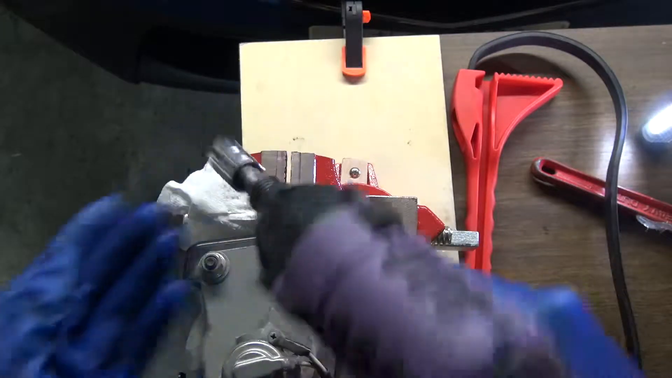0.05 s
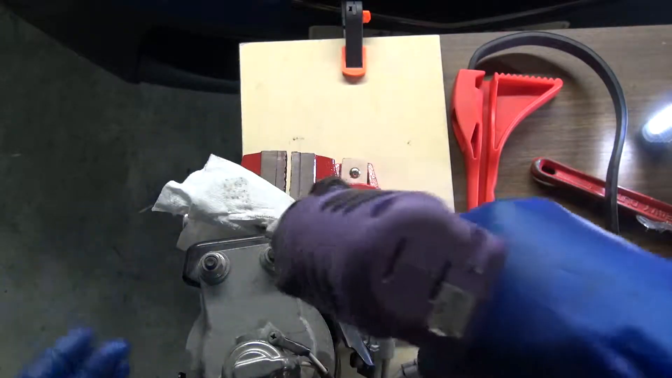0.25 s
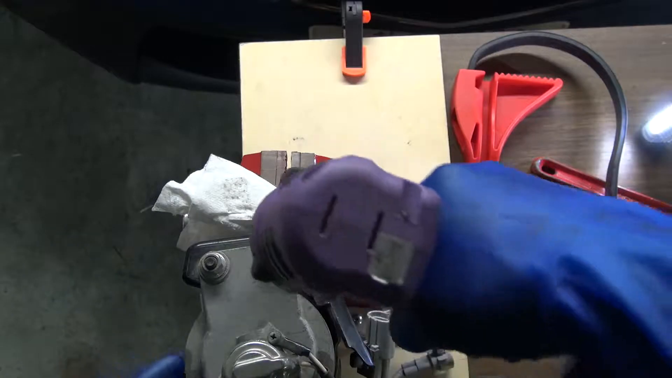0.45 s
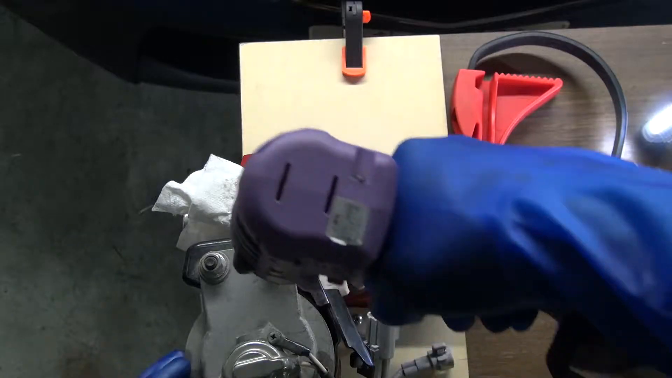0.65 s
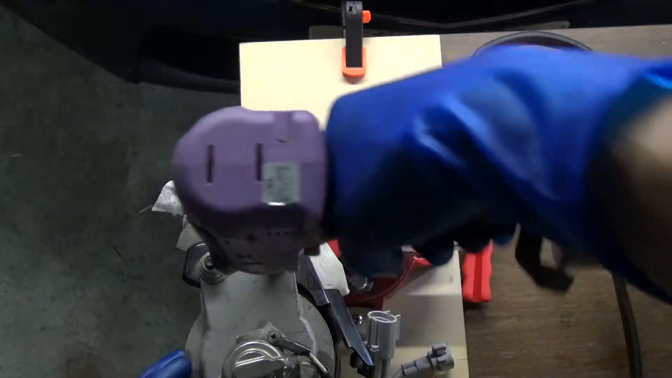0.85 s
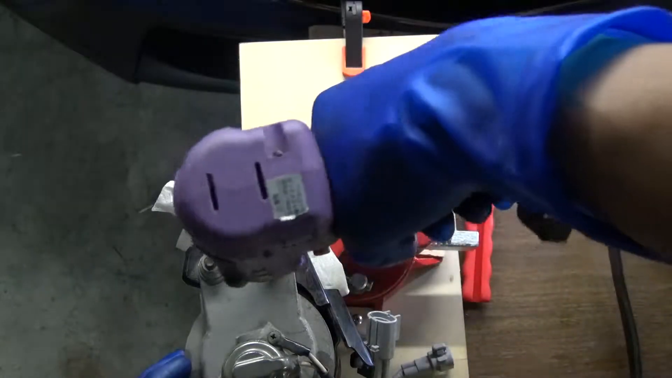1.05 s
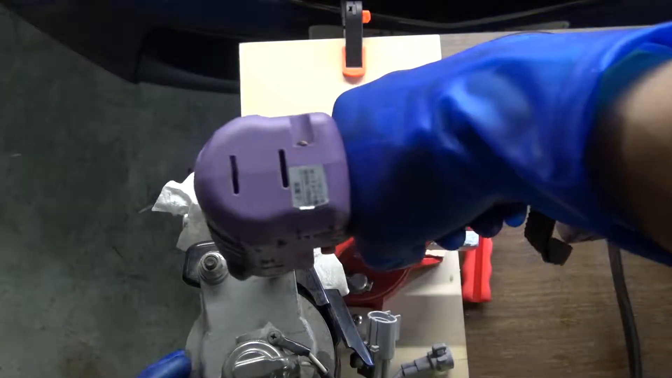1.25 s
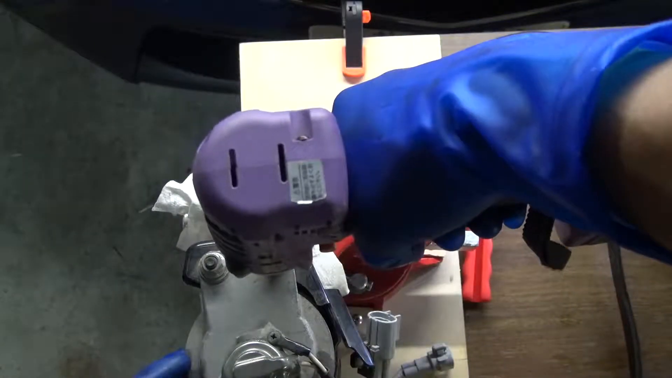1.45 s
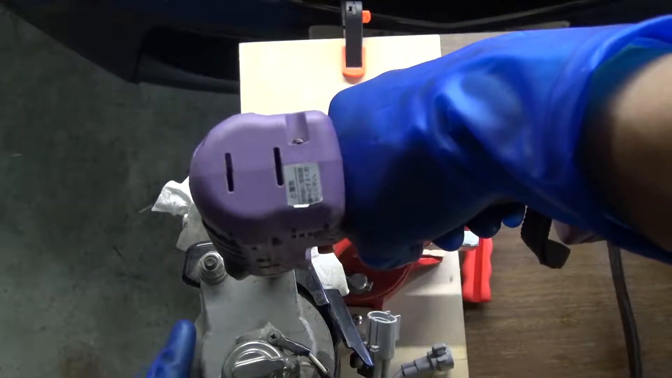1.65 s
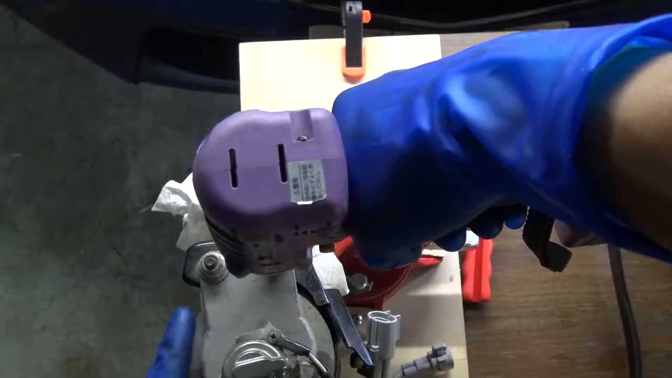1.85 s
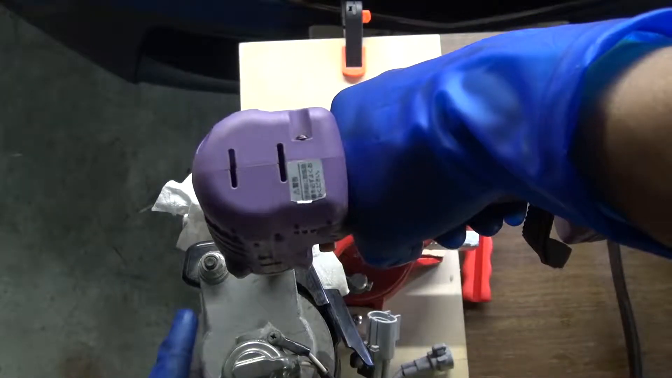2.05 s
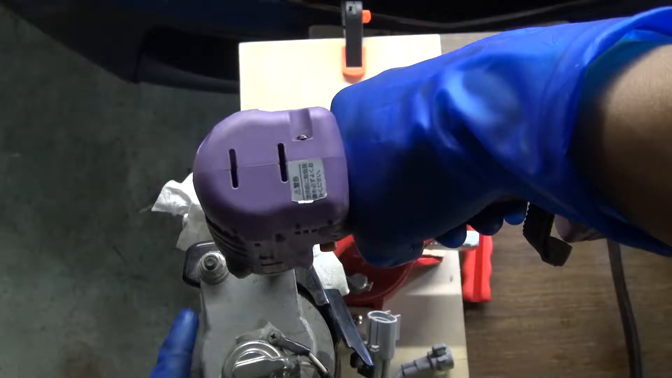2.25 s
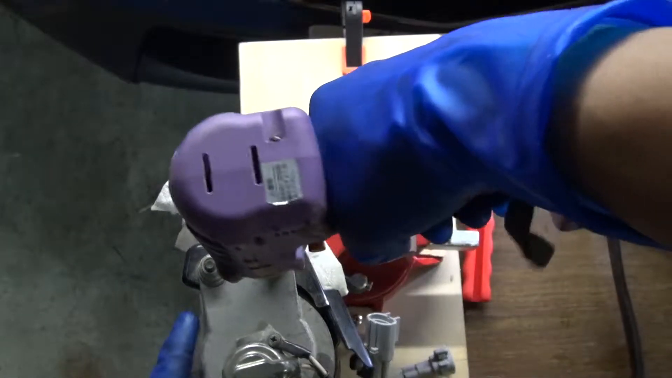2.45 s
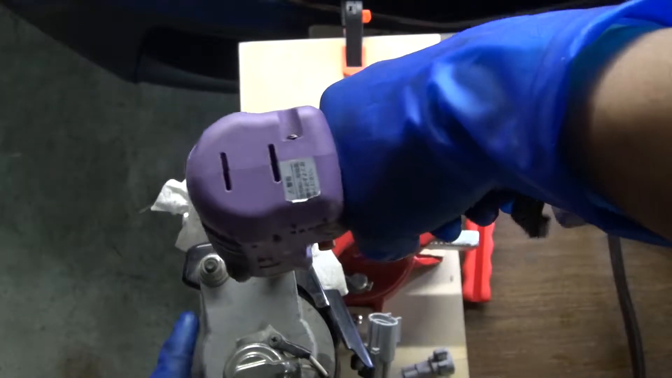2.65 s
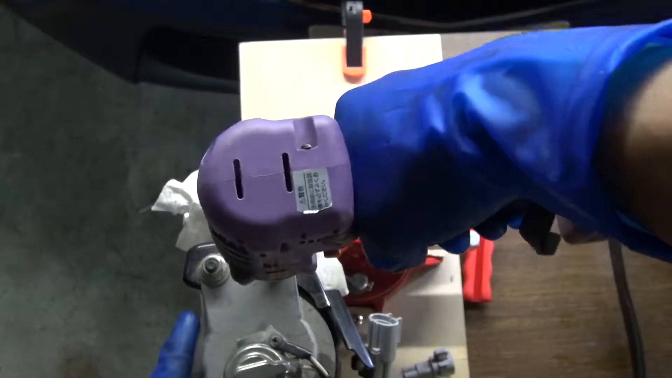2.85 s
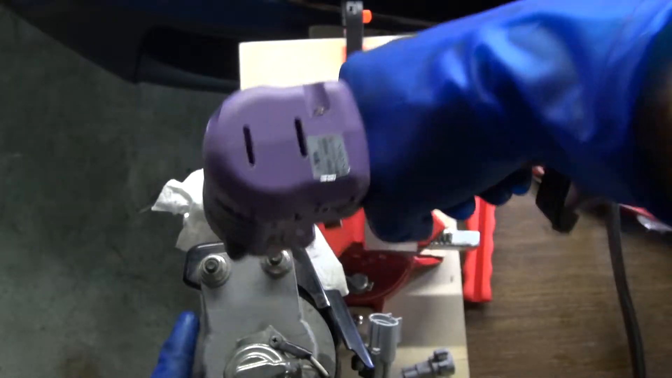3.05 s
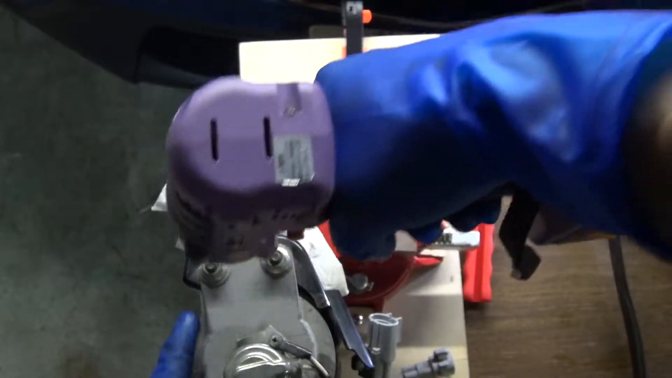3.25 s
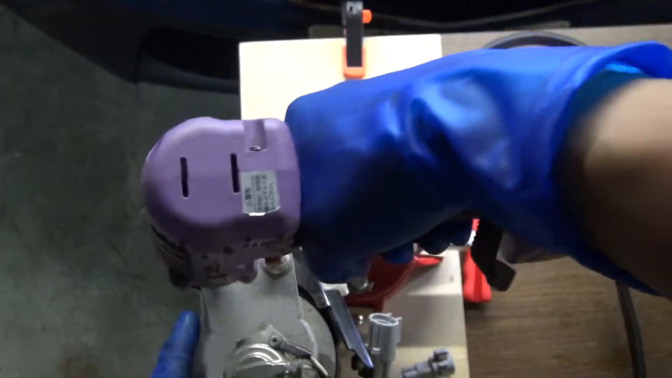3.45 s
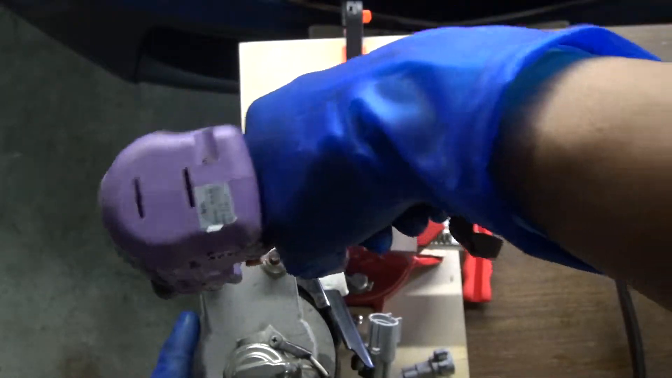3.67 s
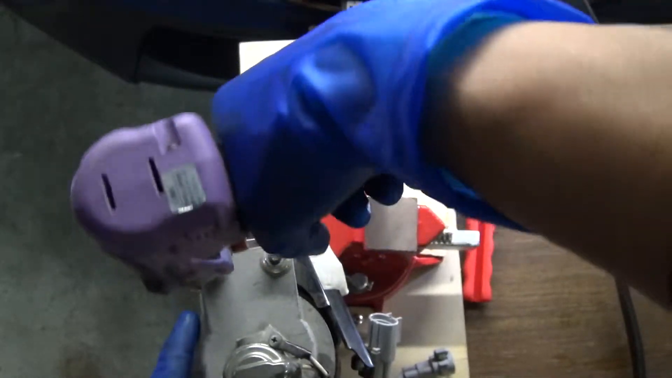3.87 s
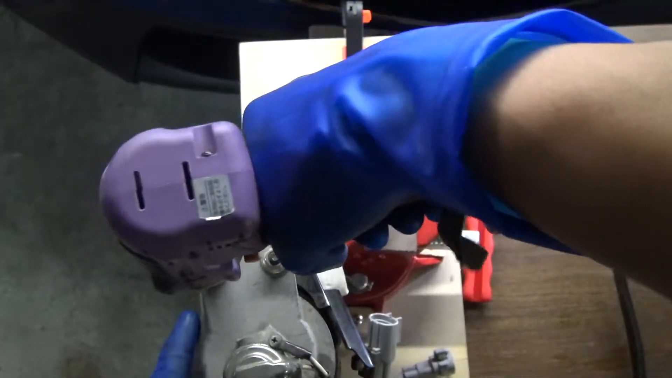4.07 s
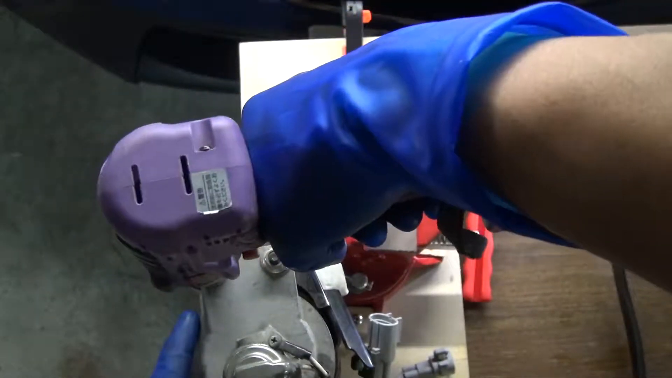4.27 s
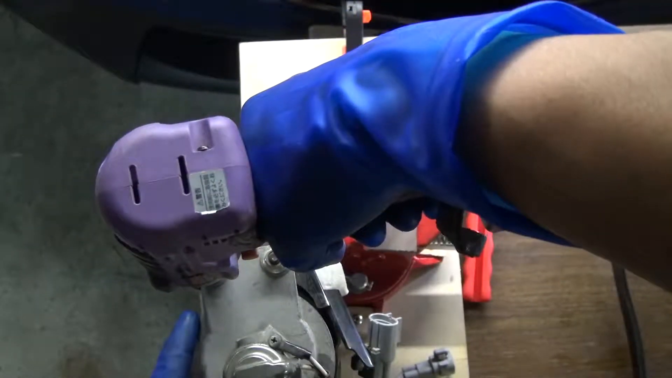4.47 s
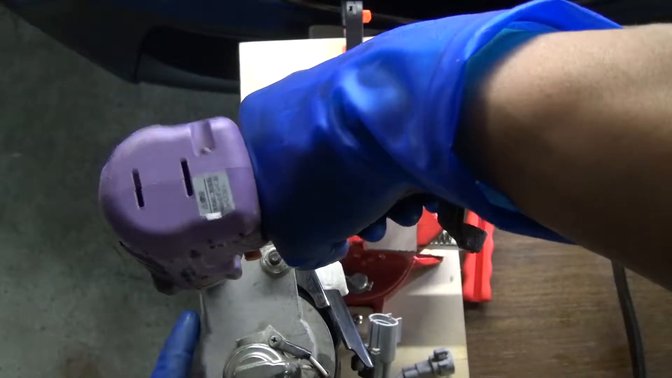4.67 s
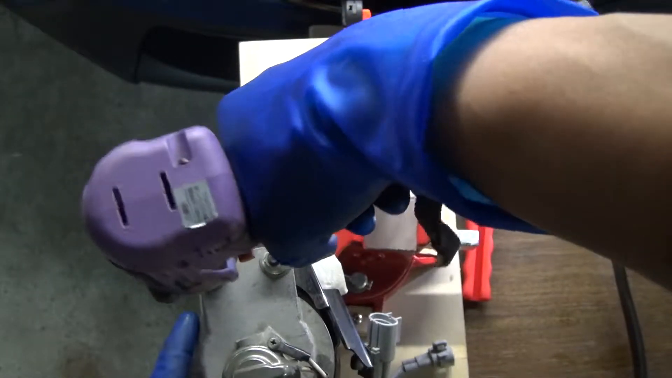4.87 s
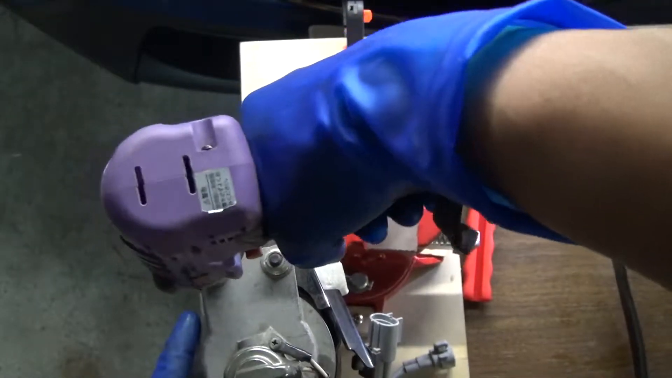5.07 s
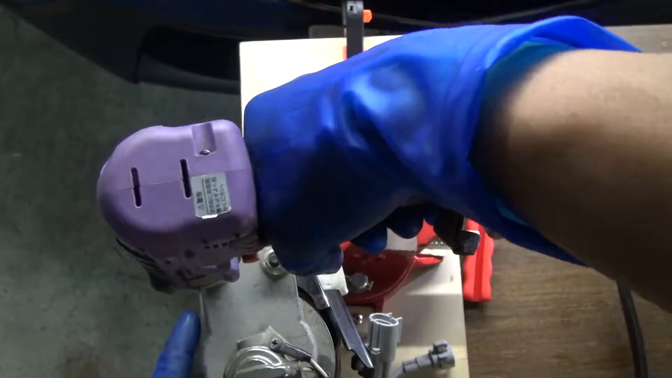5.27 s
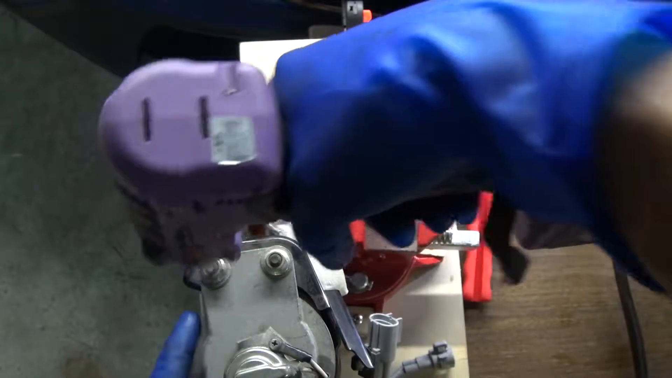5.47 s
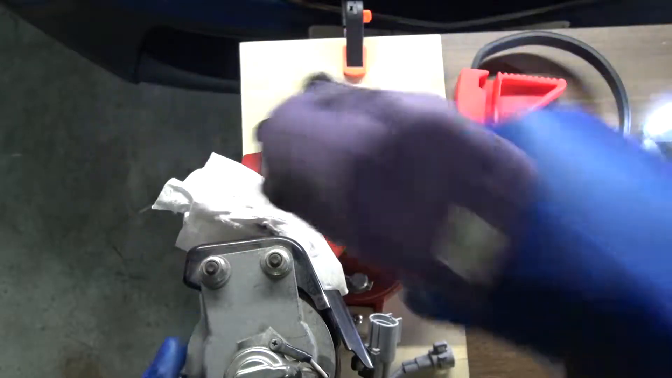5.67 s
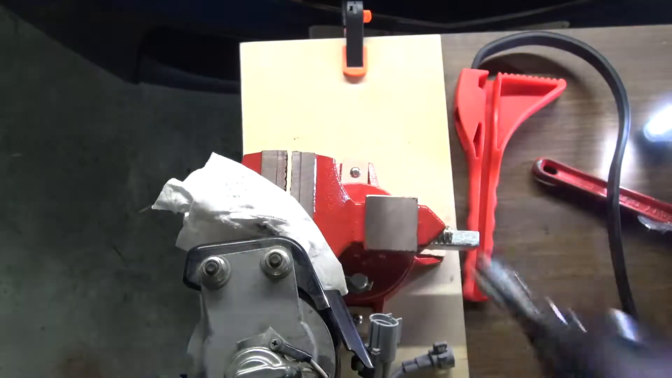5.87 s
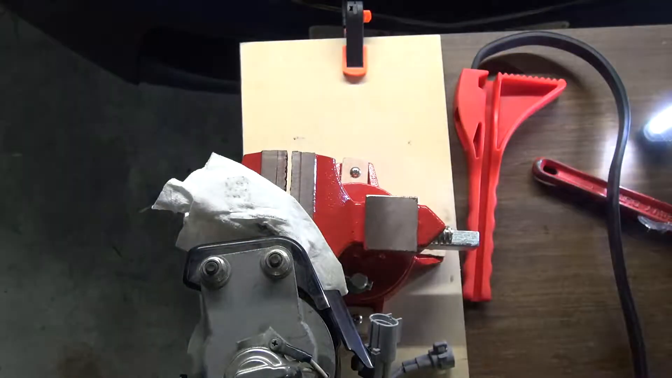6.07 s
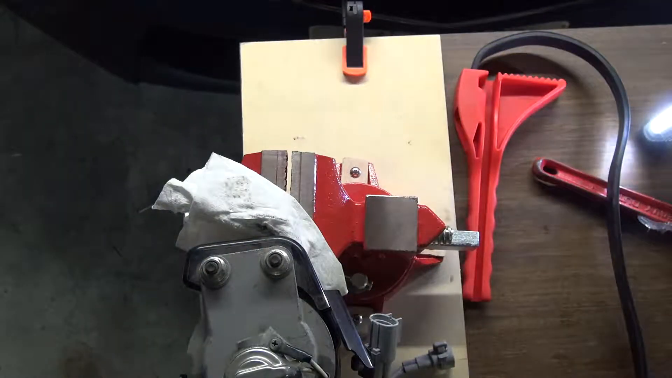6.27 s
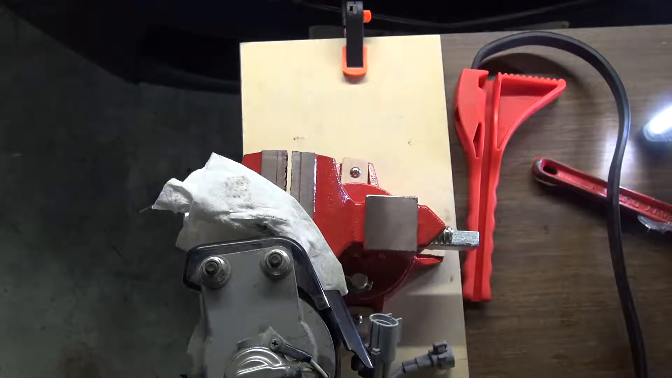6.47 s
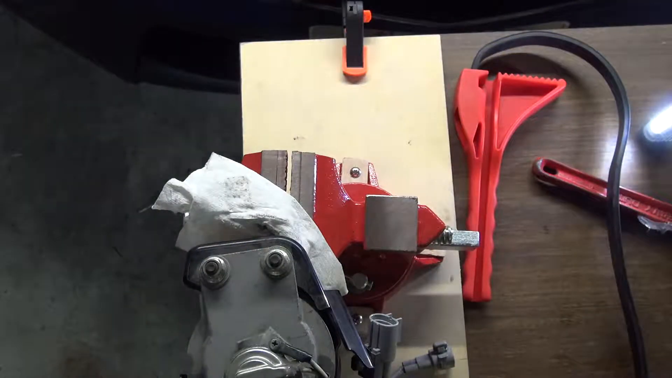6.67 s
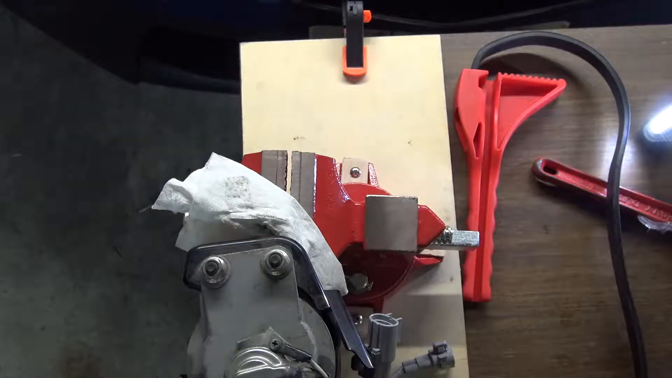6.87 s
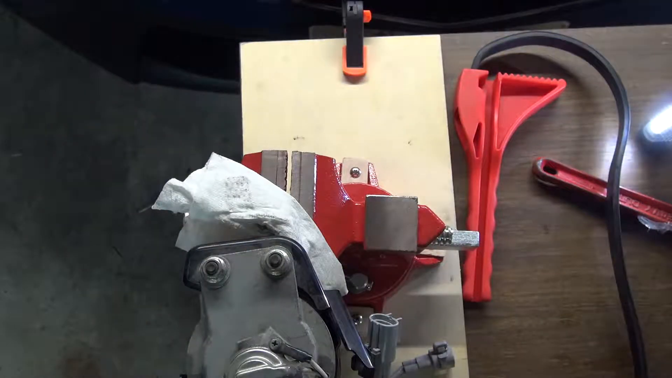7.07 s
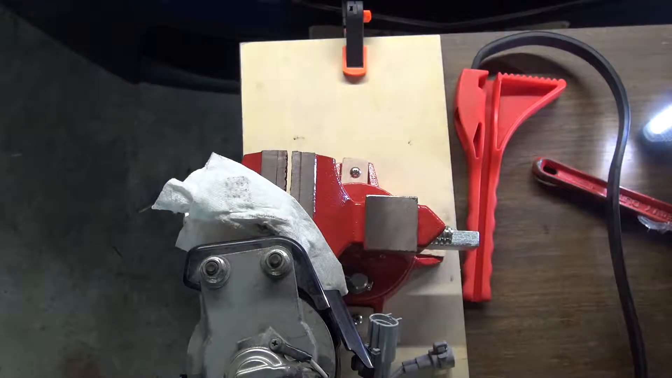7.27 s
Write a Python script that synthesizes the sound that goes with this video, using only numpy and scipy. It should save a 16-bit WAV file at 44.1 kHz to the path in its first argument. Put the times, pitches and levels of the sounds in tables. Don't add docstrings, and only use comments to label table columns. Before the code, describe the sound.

Close in a small workshop, an impact driver's motor coasts down with slowing gear ticks. Gloves rustle, a loose socket jingles and knocks on a bolt. Two quarter-second bursts of very loud, distorted metallic hammering follow, with clinks and a bench knock between them. Finally the tool is set aside with soft thumps, scrapes and rustling over faint fan hiss.

```python
import sys
import numpy as np
from scipy import signal
from scipy.fft import rfft, irfft
from scipy.io import wavfile
from scipy.ndimage import uniform_filter1d

SR = 44100
rng = np.random.default_rng(int(sys.argv[2]) if len(sys.argv) > 2 else 0)


def rack_gain(trim_db):
    fader = np.asarray(trim_db, float)
    return 10 ** (fader / 20)


def unload_wav(signal):
    wavfile.write(
        sys.argv[1],
        SR,
        np.round(np.clip(np.atleast_2d(signal).T, -1, 1) * 32767).astype(np.int16),
    )


N = 322812
TIME = np.arange(N) / SR
SNAP_LOW_HZ = 456

# [t/s, peak/dB, ring/Hz, bright share/dB, limiter clamp ahead of it/dB]
BLOWS = [(2.361, -6.5, 2710, -9.5, -12), (2.372, 3, 2500, -38.5, 9.5), (2.4106, 1, 3920, -23.5, 1.5),
         (2.437, 3, 4050, -15, 5), (2.461, -1.5, 2420, -2.5, 2.5), (2.484, 0.5, 4140, -2, 3),
         (2.5118, -0.5, 2560, -2, 2), (2.5645, -1, 2280, -6, 1), (2.586, -4, 2400, -18, 3),
         (4.734, -4.5, 2650, -34.5, 4), (4.773, 3.5, 2750, -24, 0), (4.8, -5, 2360, 1.5, 11),
         (4.824, 1.5, 3490, -7.5, 9), (4.847, -7.5, 2170, -2, 7), (4.867, 1.5, 3360, -10, 1),
         (4.879, -6, 2150, -2, 4.5), (4.894, -6, 3300, -12, 0)]
# [f/Hz, level/dB, t60/s]
BENCH = [(262.7, 2, 0.26), (387.5, 8, 0.17), (426.8, -2.5, 0.14), (530.5, -9.5, 0.26), (221, -10, 0.017)]
# [t/s, peak/dB, woody knock share/dB]
BUMPS = [(0.745, -26, -9), (0.771, -38, -21), (1.202, -51.5, -10), (5.271, -40, -14), (5.49, -41, -15),
         (5.582, -47.5, -9), (5.69, -43.5, -8), (5.778, -39, -6), (5.866, -53.5, 2), (5.934, -54.5, 6.5),
         (6.079, -38.5, -5), (6.302, -51.5, -5), (6.378, -49, -7), (6.471, -53.5, 5.5)]


def rms_one(x):
    return x / np.sqrt(np.mean(x ** 2) + 1e-20)


def in_time(rows):
    s, *columns = np.transpose(rows)
    return [np.interp(TIME, s, c, left=-150, right=-150) for c in columns]


def band(x, low_hz, high_hz):
    return signal.sosfilt(signal.butter(2, [low_hz, min(high_hz, .45 * SR)], "band", fs=SR, output="sos"), x)


def high(x, low_hz, order):
    return signal.sosfilt(signal.butter(order, low_hz, "high", fs=SR, output="sos"), x)


def coloured(x, spectrum):
    hz, db = np.transpose(spectrum)
    grid = np.arange(len(x) // 2 + 1) * SR / len(x) + 1
    return irfft(rfft(x) * rack_gain(np.interp(np.log(grid), np.log(hz), db)), len(x))


def resonance(x, hz, width_hz):
    r = np.exp(-np.pi * width_hz / SR)
    return signal.lfilter([(1 - r * r) / 2, 0, (r * r - 1) / 2], [1, -2 * r * np.cos(2 * np.pi * hz / SR), r * r], x)


def sweeping(x, hz, width):
    centres = np.geomspace(700, 5000, 18)
    place = np.log2(np.maximum(hz, 1))
    return sum(resonance(x, c, width * c) * np.exp(-((place - np.log2(c)) / 0.13) ** 2) for c in centres)


def ring(x, hz, t60_s):
    r, w = rack_gain(-60 / (t60_s * SR)), 2 * np.pi * hz / SR
    return signal.lfilter([0, np.sin(w)], [1, -2 * r * np.cos(w), r * r], x + 1e-18)


def drift(rate_hz):
    lowpass = signal.butter(2, rate_hz, fs=SR / 32, output="sos")
    slow = signal.sosfilt(lowpass, rng.standard_normal(N // 32 + 1002))
    return np.interp(np.arange(N) / 32, np.arange(N // 32 + 2), rms_one(slow[1000:]))


def grains(per_s, spread_db, gate=1):
    sizes = rack_gain(spread_db * np.minimum(rng.exponential(1, N), 5)) * rng.choice([-1, 1], N)
    clicks = rms_one(sizes * (rng.random(N) < per_s / SR))
    bed = np.sqrt(0.79 + 1 - gate ** 2)
    return gate * clicks + bed * rng.standard_normal(N)


def add(out, s, sound):
    at = round(s * SR)
    out[at:at + len(sound)] += sound[:N - at]


def sines(rows):
    beat_depth, beat_share = 0.36, 0.014
    out, t = np.zeros(N), np.arange(SR // 3) / SR
    for (s, db, hz, t60), apart in zip(rows, rng.uniform(0.69, 1.24, len(rows))):
        twin = beat_depth * np.sin(2 * np.pi * hz * (1 + beat_share * apart) * t)
        add(out, s, rack_gain(db - 3 - 60 * t / t60) * (np.sin(2 * np.pi * hz * t) + twin))
    return out


def strike(peak_db, hz, bright_db, bright_hz, t60_s, modes_db, snap):
    # [f/Hz, level/dB, t60/s]
    metal = [(1000, -5, .12), (1180, -5, .15), (1520, -8, .12), (1780, -5, .12), (2150, -4, .2),
             (2310, -2, .15), (2440, -2, .2), (2620, -6, .12), (2900, -7, .15), (3300, -8, .15),
             (4050, -6, .2), (4420, -8, .15), (6000, -12, .1), (6420, -12, .15), (7430, -8, .15),
             (8420, -8, .15), (8860, -8, .15), (9800, -12, .1)]
    t = np.arange(int(.28 * SR)) / SR
    noise, chance = rng.standard_normal((2, len(t))), rng.standard_normal((len(metal), 2))
    dying = rack_gain(-60 * t / t60_s) + snap * rack_gain(-60 * t / .012)
    dying = dying * (1 - np.exp(-t / 0.001))
    body = resonance(noise[0], hz, 0.39 * hz) + 0.26 * band(high(noise[1], 500, order=2), 740, 4300)
    body = rms_one(body) * dying
    top = resonance(noise[1], bright_hz, 1700) + 0.26 * band(noise[0], 7300, 12500)
    top = rms_one(top) * dying * rack_gain(bright_db + 4.0)
    click = (np.arange(len(t)) == 8) * 1.
    crack = 4.8 * band(click, 0.32 * hz, 3.8 * hz)
    modes = 0.9 * rack_gain(-60 * t / (0.55 * t60_s)) * np.sin(2 * np.pi * hz * t)
    modes += 1.2 * rack_gain(bright_db - 60 * t / (0.38 * t60_s)) * np.sin(2 * np.pi * bright_hz * t)
    for (mode_hz, db, decay), (a, b) in zip(metal, chance):
        near_db = max(-7 * abs(np.log2(mode_hz / hz)), bright_db - 40 * abs(np.log2(mode_hz / bright_hz)))
        level = rack_gain(db + 2.5 * a + near_db - 60 * t / (decay * 4 * t60_s))
        modes = modes + level * np.sin(2 * np.pi * mode_hz * (1 + 0.01 * b) * t)
    return rack_gain(peak_db) * high(rack_gain(-14.5) * (body + top + crack) + rack_gain(modes_db) * modes, SNAP_LOW_HZ, order=2)


def air():
    # [f/Hz, density/dB per Hz]
    hiss_spectrum = [(12, -54.5), (20, -16.5), (127, -11), (337, -7), (367, -6), (434, -12), (738, -6),
                     (1260, -6.5), (2600, -6.5), (3840, -17), (5380, -8.5), (6010, -15), (16000, -21)]
    # [f/Hz, width/Hz, level/dB]
    fan = [(5325, 420, -67), (4460, 490, -68.5)]
    hiss_db = -57.5
    tick_hz, tick_db, tick_start_s, tick_period_s = 3150, -46, .0018, 1 / 29.97
    white = rng.standard_normal((2, N))
    whistles = sum(rack_gain(db) * rms_one(resonance(resonance(white[1], hz, width), hz, width)) for hz, width, db in fan)
    clicks = np.diff(np.floor((TIME - tick_start_s) / tick_period_s), prepend=-1)
    clicks = clicks * rack_gain(0.79 * rng.standard_normal(N))
    tick = rack_gain(tick_db) * resonance(ring(clicks, tick_hz, 0.0059), tick_hz, 210)
    return rack_gain(hiss_db) * rms_one(coloured(white[0], hiss_spectrum)) + whistles + tick


def coasting():
    # [t/s, shaft/Hz, gear rattle/dB, housing resonance/Hz]
    coast = [(0, 511, -40.5, 2060), (.04, 421, -42.5, 2980), (.09, 342.5, -41, 3440), (.12, 333, -40, 4260),
             (.16, 300, -44.5, 4230), (.19, 260, -52, 3850), (.24, 217.5, -54, 3540)]
    # [multiple of shaft, level/dB]
    partials = [(1, -3), (2.25, 5.5), (1.75, -6), (3.5, -10), (4.5, -10)]
    whine_start_db, whine_fade_s = -48, 0.058
    hz, rattle_db, housing_hz = in_time(coast)
    whine_db = whine_start_db - np.minimum(TIME / whine_fade_s, 5) ** 4
    turns = np.cumsum(np.maximum(hz, 0)) / SR
    whine = sum(rack_gain(db + 1.2 * drift(60)) * np.sin(2 * np.pi * k * turns) for k, db in partials)
    ticks = np.diff(np.floor(.4 * turns + .1 * drift(150)), prepend=0) * rack_gain(1.5 * rng.standard_normal(N))
    n = SR // 4
    teeth = .45 * rms_one(ticks[:n]) + .9 * rng.standard_normal(n)
    hiss = rng.standard_normal(n)
    housing = 1.7 * sweeping(sweeping(teeth, housing_hz[:n], width=0.17), housing_hz[:n], width=0.19)
    housing = housing + 2.1 * resonance(resonance(teeth, 2040, 630), 2030, 700)
    housing = housing + 1.55 * band(hiss, 1120, 4600) + 0.51 * band(hiss + teeth, 5400, 10800)
    housing = np.pad(housing, (0, N - n))
    return rack_gain(whine_db) * whine + rack_gain(rattle_db + 5.0) * housing


def catches():
    # [t/s, peak/dB, housing ring/Hz]
    teeth = [(.009, -33, 1900), (.021, -35, 2900), (.030, -32, 2300), (.037, -31, 3100), (.043, -29, 3100),
             (.052, -30, 2900), (.081, -33, 3700), (.089, -32, 1700), (.098, -34, 1900), (.109, -32, 4400),
             (.123, -28, 4200), (.130, -32, 4300), (.134, -28, 4200), (.142, -33, 4300), (.149, -31, 4300),
             (.158, -28, 4300), (.167, -34, 4300), (.176, -36, 4100), (.186, -39, 3900), (.206, -40, 3000),
             (.218, -41, 3500)]
    t60_s, rise_s, crack_db = .009, .0004, 5
    out, t = np.zeros(N), np.arange(SR // 20) / SR
    crack = rack_gain(crack_db) * band((np.arange(len(t)) == 8) * 1., 1500, 13000)
    swell = rack_gain(-60 * t / t60_s) * (1 - np.exp(-t / rise_s))
    for s, db, hz in teeth:
        pair = np.sin(2 * np.pi * .96 * hz * t) + np.sin(2 * np.pi * 1.06 * hz * t)
        add(out, s, rack_gain(db) * (swell * 1.9 * pair + crack))
    return out


def rustle():
    # [f/Hz, density/dB per Hz]
    cloth_spectrum = [(88, -41), (150, -15.5), (254, -2), (291, -13.5), (422, -3), (484, -5), (1120, -2),
                      (1660, -1.5), (4200, -2.5), (6500, 5.5), (9080, -3.5), (13400, -13), (16000, -27.5)]
    # [t/s, level/dB]
    movement = [(0.0, -45), (0.42, -55.5), (0.83, -48.5), (1.13, -48.5), (1.28, -51.5), (1.51, -54),
                (1.73, -56), (1.98, -55.5), (3.1, -57.5), (3.3, -76.5), (3.55, -58), (3.75, -54),
                (4.11, -56), (4.446, -63), (5.15, -56), (5.75, -50.5), (5.87, -46.5), (7.32, -50)]
    # [t/s, length/s, level/dB]
    swishes = [
        (0.298, 0.29, -46),
        (1.733, 0.43, -52.5),
        (6.214, 0.04, -45),
        (6.585, 0.03, -49),
        (6.714, 0.037, -45.5),
        (6.832, 0.051, -44),
        (6.924, 0.037, -50),
    ]
    # [t/s, length/s, level/dB, first/Hz, last/Hz]
    drags = [
        (6.195, 0.33, -53, 840, 815),
        (6.475, 0.16, -51.5, 2900, 1290),
        (6.63, 0.16, -51, 1160, 1060),
    ]
    swish_dull_db, drag_settle_s, drag_edge = -2.5, 0.026, 0.25
    bright_swing, bright_at_db, pivot_db = 1.4, -47, -46
    cloth = coloured(grains(1500, spread_db=-0.5), cloth_spectrum)
    dull = rms_one(band(cloth, 150, 5000)) * rack_gain(.7 * drift(20))
    fizz = .4 * np.std(cloth) * high(rng.standard_normal(N), 10000, order=2)
    bright = rms_one(high(cloth, 4000, order=2) + fizz) * rack_gain(.8 * drift(20))
    dull_db, = in_time(movement)
    bright_db = bright_at_db + bright_swing * (dull_db - pivot_db)
    swish = sum(rack_gain(2 * db) * np.exp(-(2 * (TIME - s) / length) ** 2) for s, length, db in swishes)
    out = dull * np.sqrt(np.maximum(rack_gain(2 * dull_db) - rack_gain(-124), 0) + rack_gain(2 * swish_dull_db) * swish)
    out = out + bright * np.sqrt(np.maximum(rack_gain(2 * bright_db) - rack_gain(-140), 0) + swish)
    grit = grains(700, spread_db=3.5)
    for s, length, db, first_hz, last_hz in drags:
        t = TIME[TIME < length]
        hz = last_hz * (first_hz / last_hz) ** np.exp(-t / drag_settle_s)
        stroke = np.clip(t / 0.0092, 0, 1) * np.clip((1 - t / length) / drag_edge, 0, 1)
        add(out, s, rack_gain(db + 17.0) * stroke * sweeping(grit[round(s * SR):][:len(t)], hz, width=0.061))
    return out


def knocks():
    # [t/s, peak/dB, ring/Hz, bright share/dB]
    loose = [(0.238, -33, 2870, -5.5), (0.255, -31, 1180, -10), (0.276, -31, 1220, -9),
             (0.292, -29.5, 2820, -6), (0.298, -38, 2540, -7), (0.308, -31, 4400, -12),
             (0.3391, -26.5, 2820, 0), (0.343, -31, 4500, -14), (0.359, -23.5, 3520, -2),
             (0.366, -31, 1200, -3), (0.374, -30, 2580, -4), (0.379, -24.5, 4250, -4)]
    # [t/s, peak/dB, ring/Hz, bright share/dB, t60/s]
    bolt = [(0.601, -29.5, 2160, -32, 0.32), (0.649, -18, 2300, 0.5, 0.16), (0.68, -19, 2070, -12, 0.34),
            (0.747, -21, 1200, -37, 0.2), (0.818, -28.5, 2230, -17, 0.27), (1.539, -31, 2260, -27, 0.078),
            (1.553, -32, 2310, -28, 0.088), (2.728, -23.5, 2270, -6.5, 0.19), (4.707, -39, 2330, 2, 0.13),
            (6.474, -50.5, 2900, -31, 0.15)]
    socket = [(1.462, -41, 2210, 1.5, 0.057), (1.594, -27, 2500, -23, 0.038),
              (1.6, -29.5, 2640, -3.5, 0.55), (1.601, -21.5, 1700, -22, 0.072), (3.05, -37, 2390, -3, 0.57),
              (3.079, -25.5, 3240, -15, 0.21), (3.083, -25, 2280, 5, 0.18), (3.561, -22, 2130, -8, 0.19),
              (3.754, -32, 2030, -7.5, 0.81), (5.412, -33.5, 1550, -11, 0.12),
              (5.435, -25, 2400, -7, 0.068)]
    chuck = [(0.729, -26.5, 2970, 1.5, 0.18), (2.343, -31.5, 1720, -4.5, 0.13),
             (2.352, -31, 2560, -20, 0.099), (2.933, -38, 1784, -15, 0.094),
             (3.497, -23.5, 2570, -14.5, 0.21), (3.7935, -19, 1730, -14, 0.14),
             (4.7255, -19, 2700, -24, 0.5), (5.065, -29, 2190, -3, 0.17), (5.356, -28.5, 2720, -2, 0.2),
             (5.777, -43, 1190, -28, 0.072), (4.765, -3, 2700, -21, 0.047), (6.812, -39, 3150, -18, 1)]
    jingle_t60_s = 0.06
    jingle = [(*row, jingle_t60_s) for row in loose]
    out = np.zeros(N)
    # (rows, bright pitch/Hz, bracket modes/dB)
    for rows, bright_hz, modes_db in [(jingle, 8600, -19), (bolt, 6010, -23), (socket, 7570, -19), (chuck, 8750, -19)]:
        for s, db, hz, bright_db, t60_s in rows:
            add(out, s, strike(db, hz, bright_db, bright_hz, t60_s, modes_db, snap=4.5))
    return out


def rings():
    # [t/s, peak/dB, f/Hz, t60/s]; bracket partials under the knocks
    partials = [(.602, -35, 2170, 0.15), (.65, -24.5, 2140, 0.24), (.65, -26, 2370, 0.099),
                (.651, -39, 1210, 0.25), (.655, -31, 3670, 0.076), (.65, -27, 5900, 0.12),
                (.654, -31, 5600, .12), (.693, -36, 5800, .04), (.73, -35, 6500, 0.14),
                (.342, -33, 4600, 0.07), (.362, -36, 4450, 0.089), (.403, -36, 8700, 0.018),
                (3.796, -35, 511, 0.37), (3.797, -33, 427, .2), (3.9, -46, 430, .25),
                (3.791, -21, 960, 0.018), (3.57, -40, 382, 0.27), (.682, -32.5, 1205, 0.23),
                (.683, -32, 1780, .04), (0.744, -25.5, 1870, 0.042), (.749, -34, 1193, 0.22),
                (.819, -34, 2170, 0.13), (3.497, -31.5, 1890, 0.072), (3.498, -41, 3320, 0.09),
                (3.568, -34, 990, 0.15), (3.794, -37, 1185, 0.17), (3.795, -37, 2420, 0.09),
                (3.794, -35, 743, 0.081), (5.778, -44.5, 760, 0.092), (6.079, -43, 783, 0.083),
                (6.571, -40, 1430, .04), (6.67, -48, 1140, 0.042), (6.686, -39.5, 1150, 0.06)]
    snaps = [(.2775, -36, 8300, .015), (.2935, -36, 7200, .01), (.2985, -37, 8500, .012),
             (.309, -37, 8800, .012), (.3605, -29, 8600, .02), (1.4615, -43, 7900, .02),
             (1.6005, -23, 2300, .015), (1.601, -29, 7800, .02), (3.7912, -7, 1700, .005),
             (3.7923, -13, 2200, .005), (3.793, -12, 1500, .006), (4.7075, -40, 9000, .012),
             (5.356, -31, 3000, .006), (6.4745, -30, 1800, .005), (6.4747, -31, 3000, .006),
             (6.488, -39, 2800, .008), (6.5116, -35, 1800, .005), (6.575, -43, 3100, .015),
             (6.814, -36, 2600, .005), (6.0795, -36, 1000, .008)]
    bounces = [(.416, -38, 2500, .008), (.729, -33, 3250, .03), (.729, -36, 4100, .04),
               (1.63, -37, 2600, .02), (1.65, -40, 2200, .02), (1.688, -40, 2300, .02),
               (1.706, -42, 2500, .02), (2.958, -44, 386, .15), (3.052, -44, 3300, .05),
               (3.084, -33, 7430, .22), (3.084, -41, 4050, .12), (3.084, -37, 6400, .05),
               (3.086, -39, 10100, .15), (3.086, -39, 8400, .16), (3.084, -37, 2300, .12),
               (3.084, -36, 8860, .1), (3.088, -40, 1000, .12), (5.778, -34, 430, .11), (5.8, -45, 262, .3),
               (6.1, -46, 262, .3), (6.4, -50, 262, .3), (2.6, -28, 384, .5), (2.56, -26, 266, .4),
               (4.92, -28, 383, .5), (4.9, -30, 264, .4)]
    heel_hz, heel_db, heel_t60_s = 191, -11, 0.17
    heels = [(s, db + heel_db, heel_hz, heel_t60_s) for s, db, wood_db in BUMPS[3:]]
    return sines(partials + bounces + heels) + high(sines(snaps), SNAP_LOW_HZ, order=2)


def thumps():
    # [t/s, peak/dB, lowest mode share/dB, woody knock share/dB]
    vice = [(0.603, -40.5, -27, -1.5), (0.652, -34, -11, -1), (0.819, -37, -9.5, -7), (1.104, -55, -28, -8),
            (1.176, -50, -10, 2), (1.251, -52, -10.5, -5), (1.606, -42.5, -33, -21), (1.683, -53, -29, -17),
            (2.939, -37, -31.5, -17), (3.056, -44, -15, -6), (3.084, -50, -28, 7), (3.507, -43, -12, -2),
            (3.565, -32.5, -9, -2.5), (3.761, -41, -12.5, -2), (3.793, -31.5, -10.5, -3.5),
            (3.846, -33.5, -6.5, -16), (4.042, -58.5, -15, -13), (5.356, -52, -10.5, 12),
            (5.411, -46, -31, -6)]
    # [f/Hz, level/dB, t60/s]
    wood = [(764, -4, 0.1), (970, 0, 0.041), (1180, -5, 0.17)]
    push_upper_db, bump_upper_db, bump_lowest_db = -12.5, -1, -19.5
    out, t = np.zeros(N), np.arange(SR // 3) / SR
    swell = 1 - np.exp(-t / 0.0023)
    pushes = [(s, db, lowest_db, push_upper_db, wood_db) for s, db, lowest_db, wood_db in vice]
    bumps = [(s, db, bump_lowest_db, bump_upper_db, wood_db) for s, db, wood_db in BUMPS]
    for s, db, lowest_db, upper_db, wood_db in pushes + bumps:
        middle_db = min(-8.5 - 1.47 * (max(lowest_db, upper_db) + 8.5), 0)
        shares = [lowest_db + 6.5, middle_db - 1.0, upper_db + 8, wood_db, lowest_db] + [wood_db] * len(wood)
        chance, noise = rng.standard_normal((len(shares), 2)), rng.standard_normal(len(t))
        for (hz, mode_db, t60), share_db, (a, b) in zip(BENCH + wood, shares, chance):
            level = rack_gain(db + mode_db + share_db + 0.15 * a - 60 * t / t60)
            add(out, s, level * swell * np.sin(2 * np.pi * hz * (1 + 0.005 * b) * t))
        thud = rms_one(band(noise, 198, 490)) * rack_gain(-13.5 - 60 * t / 0.42)
        thud = thud + rms_one(band(noise, 310, 1340)) * rack_gain(wood_db - 2.5 - 60 * t / 0.26)
        add(out, s, rack_gain(db) * swell * thud)
    return out


def follow(start, stop, rule):
    spin_down_s, tail_s = 0.05, 0.34
    first, swell_s, held, last, drop, dying = rule
    down = stop + spin_down_s
    return in_time([(start, first), (start + swell_s, held), (stop, last), (down, last - drop),
                    (down + tail_s, last - drop - dying * tail_s)])[0]


def cracks():
    # [t/s, peak/dB]
    contacts = [(2.411, -8), (2.4616, -8), (2.4859, -10), (2.5049, -11), (2.5195, -4.5), (2.5894, -3.5),
                (4.7331, -10), (4.7364, -7), (4.7657, -12.5), (4.8001, 1.5), (4.8205, -0.5), (4.8792, -12)]
    t60_s = .004
    out, t = np.zeros(N), np.arange(SR // 100) / SR
    for (s, db), noise in zip(contacts, rng.standard_normal((len(contacts), len(t)))):
        add(out, s - .0003, rack_gain(db + 0.5 - 60 * t / t60_s) * rms_one(band(noise, 1300, 12000)))
    return out


def driver():
    # [start/s, release/s, level/dB]
    bursts = [
        (2.3622, 2.597, -12.5),
        (4.731, 4.912, -13),
    ]
    # [f/Hz, density/dB per Hz]
    hammer = [(12, -70), (20, -41), (177, -15), (255, 11.5), (310, 4), (388, 7), (472, -4.5), (590, -9),
              (1150, -8.5), (2020, -6.5), (2390, -6.5), (2990, -13), (8650, -9.5), (13500, -9.5),
              (16000, -20.5)]
    # [f/Hz, level/dB, t60/s]
    bracket = [(1000, -5, .12), (1180, -5, .15), (1520, -8, .12), (1780, -5, .12), (2150, -4, .2),
               (2310, -2, .15), (2440, -2, .2), (2620, -6, .12), (2900, -7, .15), (3300, -8, .15),
               (4050, -6, .2), (4420, -8, .15), (6000, -12, .1), (6420, -12, .15), (7430, -8, .15),
               (8420, -8, .15), (8860, -8, .15), (9800, -12, .1)]
    anvil_hz = [8700, 6300, 7200, 8600, 8530]
    # [t/s, peak/dB, ring/Hz, bright share/dB]
    further_blows = [(2.377, -14, 2740, -20), (2.388, -4, 2280, -18.5), (2.395, 1.5, 3140, -17.5),
                     (2.402, 1.5, 1650, -21), (2.42, -9, 2840, -9.5), (2.442, -5, 4200, -12),
                     (2.466, -8, 4500, 1.5), (2.501, -9, 2400, -9), (2.517, -11, 2200, -8),
                     (2.527, -2, 2350, -15), (2.545, -1, 2404, -5), (2.572, 0.5, 2320, -11.5),
                     (2.6, -7, 2570, -13.5), (2.607, -7, 1810, -23), (4.742, -4.5, 2520, -18),
                     (4.752, 3, 3000, -25), (4.784, -7, 3120, -7), (4.792, -1, 2870, -7), (4.83, -6, 3200, 2)]
    # [first/dB, swell/s, held/dB, at release/dB, spin-down drop/dB, dying/dB per s]
    body_follows = (-17.5, 0.06, -1, -2, 6.5, 171)
    bright_follows = (-40, -0.0355, -4, -2, 12, 228)
    bench_follows = (-38, 0.17, -8.5, -6, 14, 117)
    sag_db_per_s, further_bright_hz, further_t60_s = 80, 8650, 0.11
    out = np.zeros(N)
    pulled = sum(np.interp(TIME, [start - .1, start, stop - .01, stop + .01], [0, 1, 1, 0])
                 for start, stop, db in bursts)
    rattle = coloured(grains(1300, spread_db=3.8, gate=pulled), hammer)
    ringing = sum(rack_gain(db) * resonance(rattle, hz, 0.0019 * hz) * (-1) ** k
                  for k, (hz, db, t60) in enumerate(bracket))
    body = rms_one(band(rattle + 1.5 * ringing, 500, 5500)) * rack_gain(1.6 * drift(90))
    bright = rms_one(high(rattle + 2.1 * ringing, 5700, order=1)[::-1]) * rack_gain(1.7 * drift(60))
    white = rng.standard_normal(N)
    boom = rms_one(sum(rack_gain(db) * ring(white, hz, t60 * 1.16) for hz, db, t60 in BENCH))
    boom = rms_one(boom + 0.33 * rms_one(band(rattle, 22, 674)))
    boom = rms_one(boom / np.sqrt(uniform_filter1d(boom ** 2, size=1800) + .05))
    blown = np.array(BLOWS)[:, 0]
    since = np.clip(TIME - blown[np.maximum(np.searchsorted(blown, TIME) - 1, 0)], 0, .03)
    body, bright = rack_gain(0.5 - sag_db_per_s * since) * [body, bright]
    for start, stop, db in bursts:
        for part, rule in [(body, body_follows), (bright, bright_follows), (boom, bench_follows)]:
            out += rack_gain(db + follow(start, stop, rule)) * part
    for k, (s, db, hz, bright_db, clamp_db) in enumerate(BLOWS):
        bright_hz = anvil_hz[k % len(anvil_hz)]
        add(out, s, strike(db, hz, bright_db, bright_hz, t60_s=0.26, modes_db=-21, snap=1.0))
    for s, db, hz, bright_db in further_blows:
        add(out, s, strike(db, hz, bright_db, further_bright_hz, further_t60_s, modes_db=-17.5, snap=2.3))
    return out + cracks()


def workshop(x):
    # [f/Hz, t60/s]
    room = [(200, 0.52), (1000, 0.18), (4000, 0.091), (12000, 0.15)]
    room_db = -8
    room_hz, room_t60_s = np.transpose(room)
    t = np.arange(SR // 2) / SR
    noise, tail = rng.standard_normal(len(t)), 0
    for hz in 177 * 2. ** np.arange(7):
        t60_s = np.interp(np.log(hz), np.log(room_hz), room_t60_s)
        tail = tail + band(noise, hz / np.sqrt(2), hz * np.sqrt(2)) * rack_gain(-60 * t / t60_s)
    tail = tail * np.clip(t / 0.0027, 0, 1)
    return rack_gain(room_db) * signal.fftconvolve(x, tail / np.sqrt(np.sum(tail ** 2)))[:N]


def scene():
    near, wood = knocks() + coasting() + catches() + rings(), thumps()
    small = high(near + wood + workshop(near + 0.63 * wood) + rustle(), 160, order=4)
    return (small + high(driver(), 170, order=4) + air())[None, :]


def band_limit(x):
    return signal.sosfilt(signal.butter(12, 16660, fs=SR, output="sos"), x)


def record(dry):
    # [f/Hz, level/dB]
    microphone = [(10, -5), (10000, -1.5), (11000, -7), (22050, -0.5)]
    gain_db = np.zeros(N)
    for s, *_, clamp_db in BLOWS:
        gain_db -= clamp_db * np.interp(TIME - s, [-.0035, -.0022, -.0003, 0], [0, 1, 1, 0])
    heard = coloured(dry[0], microphone)[None, :]
    held = .8 * np.tanh(heard * rack_gain(gain_db) / .8)
    cut = signal.sosfilt(signal.cheby2(10, 50, 16650, fs=SR, output="sos"), held)
    return band_limit(high(cut, 74, order=1))


dry = scene()
out = record(dry)
unload_wav(out)
```